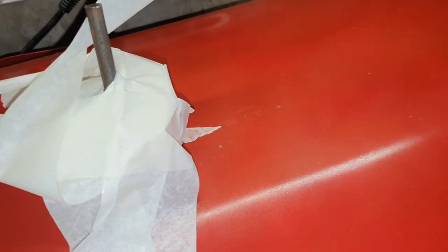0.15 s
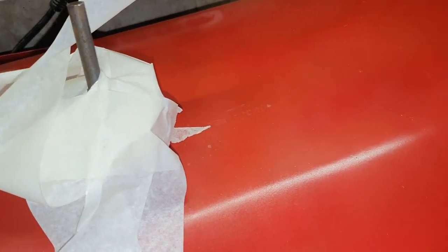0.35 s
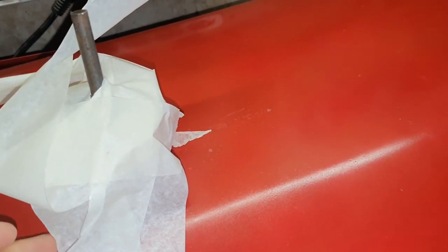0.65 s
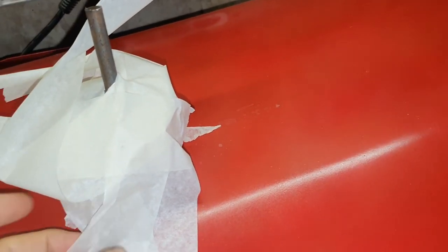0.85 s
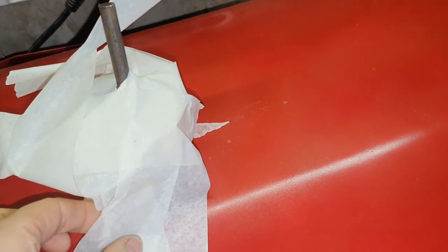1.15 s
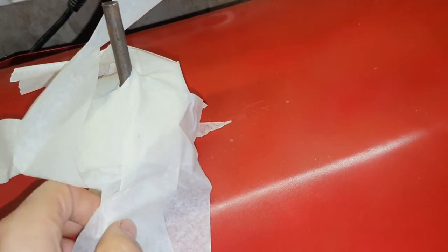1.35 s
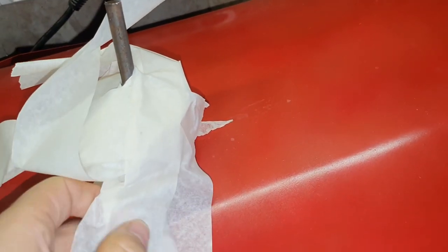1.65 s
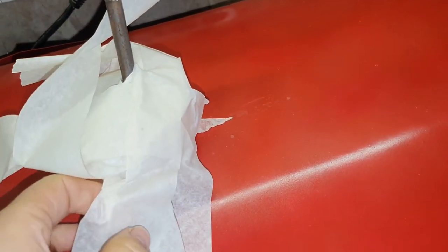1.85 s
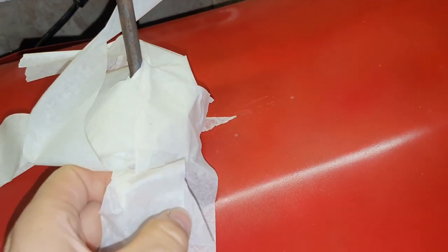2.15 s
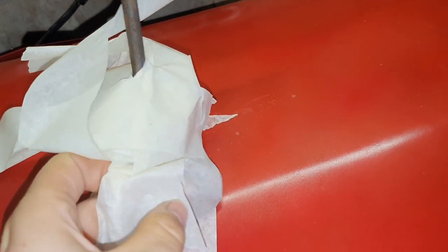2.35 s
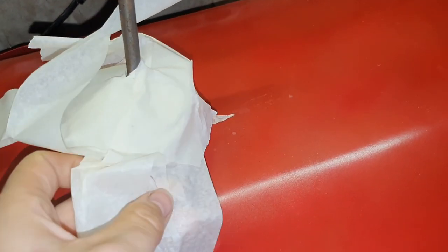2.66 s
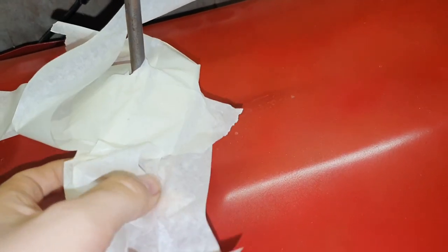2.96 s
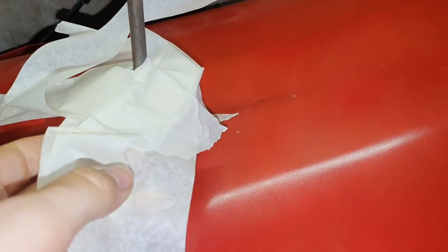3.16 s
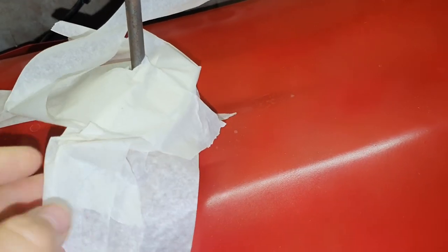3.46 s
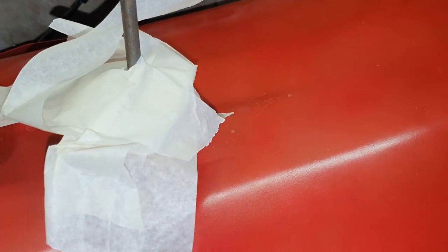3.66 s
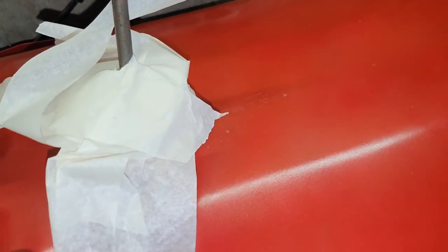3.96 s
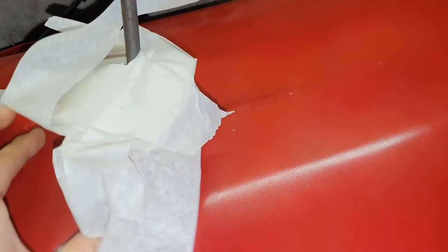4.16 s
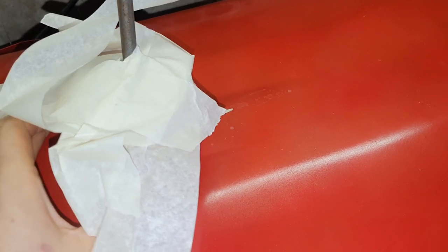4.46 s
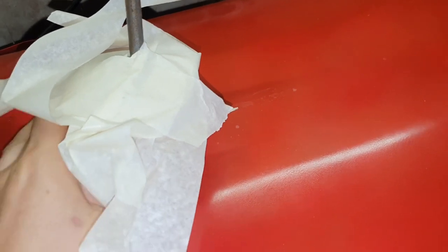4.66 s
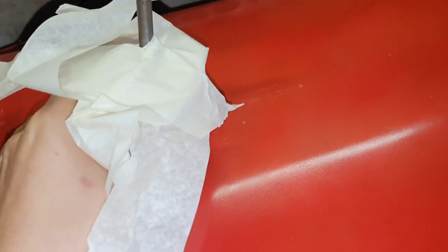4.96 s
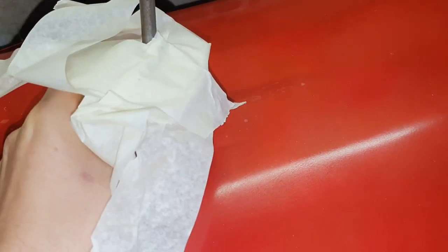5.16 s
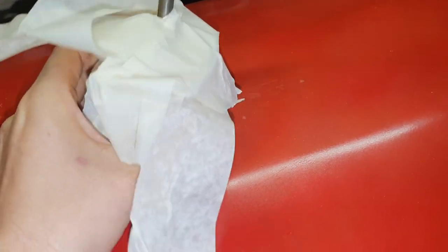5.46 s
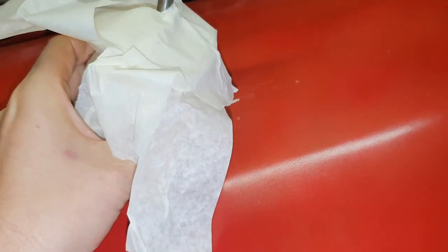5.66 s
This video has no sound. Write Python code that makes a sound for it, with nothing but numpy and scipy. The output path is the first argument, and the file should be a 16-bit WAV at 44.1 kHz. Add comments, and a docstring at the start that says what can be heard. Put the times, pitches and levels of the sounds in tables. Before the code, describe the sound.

Paper tape crinkles and tears loose right by a small handheld microphone pair, over faint low room hush. Bright snaps and glue crackle come in clumps, strongest just after one second and again past two, while the hollow steel booms softly under the tugs. Then comes a brief skin-on-paper rub, near quiet, sparse crackles, and a fist crumpling against the panel.

```python
"""A faint crackle and a low drumming open over a quiet garage hush, then masking tape snaps and tears, close by.
The tape comes off a painted steel panel by hand and is crumpled: creases ring as short pitched clicks,
glue parts as clouds of tiny ticks, a thumb hisses on the paper through broad resonances,
and the drag and tugs of the tape drum the hollow panel's modes.
Of a phone's two microphone ports the left hears it first; the right is dull in the top treble."""
import sys
import numpy as np
from scipy import signal
from scipy.fft import rfft, irfft, next_fast_len
from scipy.io import wavfile
from scipy.ndimage import uniform_filter1d, map_coordinates

SR = 44100
rng = np.random.default_rng(int(sys.argv[2]) if len(sys.argv) > 2 else 0)


def dump_mix(stems):
    """Bounce the given channels to the path in sys.argv[1] as a 16-bit WAV at rate SR."""
    frames = np.atleast_2d(stems).T  # one column per channel
    limited = np.clip(frames, -1, 1)  # hard clip at full scale
    pcm = np.round(limited * 32767).astype(np.int16)
    wavfile.write(sys.argv[1], SR, pcm)


N = 256662


def amp(db):
    """dB to gain."""
    return 10 ** (np.asarray(db) / 20)


def unit(x):
    """Scaled to rms 1."""
    return x / np.sqrt(np.mean(x ** 2) + 1e-20)


def along(points, hz):
    """(Hz, value) points read on a log frequency axis."""
    f, v = np.transpose(points)
    return np.interp(np.log(hz + 1), np.log(f + 1), v)


def curves(rows):
    """One value per sample for each column after the time."""
    s, *cols = np.transpose(rows)
    return [np.interp(np.arange(N) / SR, s, c) for c in cols]


def wobble(rate):
    """A smooth random curve, rate knots a second."""
    knots = rng.standard_normal(int(N * rate / SR) + 4)
    return map_coordinates(knots, [np.arange(N) * rate / SR])


def filtered(x, response):
    """x times a complex response of frequency."""
    m = next_fast_len(x.shape[-1] + 8192)
    spectrum = rfft(x, m) * response(np.fft.rfftfreq(m, 1 / SR))
    return irfft(spectrum, m)[..., :x.shape[-1]]


def mode(f, hz, width):
    """A causal resonance of peak gain 1."""
    return 1j * f * width / (hz * hz - f * f + 1j * f * width)


def noise(spectrum, alike):
    """Stereo noise of rms 1; alike is how much both sides share, 0 to 1."""
    alike = np.clip(alike, 0, 1)
    mid, side = rng.standard_normal((2, N)) * np.sqrt([[1 + alike], [1 - alike]])
    return unit(filtered(np.array([mid + side, mid - side]), lambda f: amp(along(spectrum, f))))


def white(alike):
    """Stereo noise with a flat spectrum."""
    return noise([(100, 0)], alike)


def evened(x, span_s, share):
    """Chance swells longer than span_s are partly levelled out."""
    power = np.abs(uniform_filter1d((x ** 2).mean(0), round(span_s * SR)))
    return unit(x / (power + 1e-12) ** (share / 2))


def patchy(x, depth_db):
    """Folds in the paper favour now one band, now another."""
    z = signal.stft(x, nperseg=256)[2]
    field = rng.standard_normal(z.shape[1:])
    field = uniform_filter1d(uniform_filter1d(field, size=4, axis=0), size=6, axis=1)
    return signal.istft(z * amp(depth_db * unit(field)), nperseg=256)[1][:, :N]


# colour of the garage hush: frequency_hz, relative_level_db
HUSH_COLOUR = [(15, -28.5), (30, -3.5), (110, 3), (170, -16.5), (290, -13), (450, -21), (900, -27),
               (5000, -32.5), (7300, -30.5), (15500, -35.5)]


def hush():
    """Steady garage air: shaped noise, mostly low, partly shared by both sides."""
    return amp(-73) * noise(HUSH_COLOUR, alike=0.45)


# how fast the nearby surfaces die away: frequency_hz, t60_s
WALL_DECAY = [(200, 0.2), (2000, 0.13), (10000, 0.11)]


def walls(x, step=SR // 4):
    """Nearby surfaces answer with a short diffuse tail, redrawn each quarter second so no fixed colour builds up."""
    out = np.zeros((2, N + SR))
    for k in range(0, N, step):
        hz, t, z = signal.stft(rng.standard_normal((2, step)), SR, nperseg=128)
        fading = amp(-60 * t / along(WALL_DECAY, hz)[:, None])
        tail = signal.istft(z * fading, SR, nperseg=128)[1]
        wet = signal.fftconvolve(x[:, k:k + step], tail / np.linalg.norm(tail[0]), axes=1)
        out[:, k + 60:][:, :wet.shape[1]] += wet  # 60 samples of travel
    return out[:, :N]


# resonances of the hollow steel panel: pitch_hz, width_hz, level_db
PANEL_MODES = [(179.6, 32, -17.5), (299, 31.7, 5.5), (441, 48, -12), (587.8, 47, -12.5), (726, 150, -11),
               (990, 35, -14.5), (1260, 28, -14.5)]


def steel(f):
    """The panel's modes under a steady shake, neighbours in opposite phase."""
    return sum((-1) ** k * amp(db) * mode(f, hz, width) for k, (hz, width, db) in enumerate(PANEL_MODES))


# the closing fist leaning on the panel's lowest mode: start_s, level_db
FIST = [(5.31, -110), (5.335, -50), (5.42, -42), (5.5, -50), (5.56, -68), (5.62, -110)]


def grip():
    """The closing fist leans on the panel: noise through its lowest mode alone, twice over."""
    hz, width, _ = PANEL_MODES[0]
    lowest = unit(filtered(white(alike=1.0), lambda f: mode(f, hz, width) ** 2))
    return amp(curves(FIST)[0]) * lowest


# sudden tugs: start_s, level_db, upper_modes_db (added above 350 Hz), free_ring_s, rustle_db
PANEL_TUGS = [(0.654, -51.5, 20, 0.022, -61), (0.795, -59.5, 24, 0.025, -58),
              (0.927, -54.5, 17.5, 0.037, -57), (0.966, -48, 7, 0.1, -45.5), (1.184, -54, -5, 0.025, -59),
              (1.303, -28, 14, 0.056, -29.5), (1.431, -43.5, 18, 0.06, -65), (1.64, -43.5, 14, 0.06, -45.5),
              (1.951, -47, 18, 0.068, -43.5), (2.049, -55.5, 21, 0.043, -100),
              (2.177, -55.5, 29, 0.078, -46.5), (2.271, -54.5, 21, 0.045, -41),
              (2.408, -44.5, 11, 0.065, -37.5), (2.549, -58.5, 20, 0.04, -35.5),
              (2.598, -42, 12.5, 0.053, -42.5), (2.644, -37.5, 11, 0.088, -46),
              (2.755, -26.5, 12, 0.07, -35), (2.919, -48, -15.5, 0.17, -74), (3.004, -36.5, 10, 0.092, -51),
              (4.632, -49.5, 19, 0.03, -54), (4.703, -49.5, 12.5, 0.13, -47),
              (4.912, -49.5, 5, 0.093, -53.5), (5.235, -43.5, -26, 0.069, -55.5),
              (5.325, -37, 17, 0.13, -34), (5.39, -48.5, 21, 0.07, -52.5), (5.485, -54.5, 15, 0.052, -62.5),
              (5.536, -47.5, -3.5, 0.063, -72), (5.73, -71, 15, 0.037, -55)]
DETUNE = .012  # spread of each mode's pitch from tug to tug as the hand's pressure shifts it, a share


def tug_rings():
    """Each tug sets the panel's modes ringing as decaying sines until tape or hand damps them."""
    out, t = np.zeros((2, N)), np.arange(SR // 4) / SR
    hz, width_hz, mode_db = np.transpose(PANEL_MODES)[:, :, None]
    upper = hz > 350
    for s, db, upper_db, free_s, _ in PANEL_TUGS:
        strength = mode_db + upper_db * upper + rng.normal(0, 0.67, hz.shape)
        # the stuck tape soaks up the upper modes faster than the lower ones
        decay = np.exp(-.6 * width_hz * np.where(upper, 3.5, 1) * t)
        tone = np.sin(2 * np.pi * hz * rng.normal(1, DETUNE, hz.shape) * t)
        ring = (amp(strength) * decay * tone).sum(0)
        damped = (1 - np.exp(-t / 0.00065)) * amp(-60 * np.clip(t - free_s, 0, 1) / 0.059)
        at = round(s * SR)
        out[:, at:at + len(t)] += (amp(db) * ring * damped)[:N - at]
    return out


# how hard the tape drags at the panel: start_s, drumming_db
DRAG = [(0, -63), (.21, -84), (.5, -83), (.55, -61), (.68, -58), (1.15, -54.5), (1.31, -32), (1.6, -65.5),
        (1.92, -71.5), (2.0, -65.5), (2.45, -45), (2.75, -37.5), (2.97, -59.5), (3.16, -50), (3.58, -69.5),
        (4.0, -80), (4.12, -49.5), (4.38, -53), (4.5, -63.5), (5.04, -52.5), (5.19, -73.5), (5.3, -56.5),
        (5.43, -34.5), (5.64, -70.5), (5.82, -51)]
# colour of the rustle: frequency_hz, relative_level_db
RUSTLE_COLOUR = [(150, -31.5), (300, -7), (480, 0.5), (640, 12.5), (850, -14.5), (1200, -1), (1800, -8.5),
                 (3500, -23.5), (8000, -46.5)]
FIRM_DB = -40  # drumming of a firm pull
RUSTLE_DB, RUSTLE_GROWS = -55.5, 1.25  # level at a firm pull; dB per dB of pull
# a tug leaves the tape shuddering: level against the tug's, rise time, fading
SHUDDER_DB, SHUDDER_RISE_S, SHUDDER_DB_PER_S = -6.5, 0.0051, 160


def drag():
    """Dragging tape shakes the panel and rustles all along, with a fading shudder after each tug."""
    pull_db = curves(DRAG)[0]
    drum = amp(pull_db)
    rustle = amp(RUSTLE_DB + RUSTLE_GROWS * (pull_db - FIRM_DB))
    for s, db, _, _, rustle_db in PANEL_TUGS:
        since = np.clip(np.arange(N) / SR - s, 0, None)
        shudder = (1 - np.exp(-since / SHUDDER_RISE_S)) * amp(-SHUDDER_DB_PER_S * since)
        drum = drum + amp(db + SHUDDER_DB) * shudder
        rustle = rustle + amp(rustle_db) * shudder
    shake = white(alike=0.89) * amp(4.8 * wobble(40))
    out = drum * evened(filtered(shake, steel), span_s=0.02, share=0.43)
    return out + rustle * amp(3 * wobble(70)) * noise(RUSTLE_COLOUR, alike=.9)


# colour of the hand's weight on the panel: frequency_hz, relative_level_db
RUMBLE_COLOUR = [(15, -42), (25, -20), (86, 1), (130, 1.5), (167, -3.5), (220, -5), (290, -15.5),
                 (480, -120)]
RUMBLE_DB, RUMBLE_GROWS = -55, 0.68  # level at a firm pull; dB per dB of pull


def rumble():
    """The hand's weight on the panel: low noise that grows with the pull."""
    level_db = RUMBLE_DB + RUMBLE_GROWS * (curves(DRAG)[0] - FIRM_DB)
    return amp(level_db + 0.93 * wobble(27)) * noise(RUMBLE_COLOUR, alike=1.0)


def panel():
    """All that sounds through the steel."""
    return drag() + rumble() + grip() + tug_rings()


# thumb sliding over the paper: start_s, level_db
THUMB = [(3.19, -67), (3.225, -47), (3.3, -47.5), (3.4, -50.5), (3.435, -63), (3.499, -60.5), (3.52, -100)]
# resonances of the gap under the thumb: pitch_hz, width_hz, level_db
THUMB_GAP = [(3000, 700, -5), (4600, 800, 1), (6800, 800, 0), (10000, 1400, -9)]
# colour of the tape's paper, here and in the crackle and snaps: frequency_hz, relative_level_db
PAPER_COLOUR = [(100, -90.5), (350, -15.5), (1000, -0.5), (2000, -2), (3000, 0), (5000, -2), (6600, -1.5),
                (7400, -6.5), (12000, -3), (16000, -8.5)]


def slide():
    """Skin on paper hisses through the broad resonances of the gap under the thumb."""
    def gap(f):
        return 0.022 + sum(amp(db) * np.abs(mode(f, hz, width)) ** 2 for hz, width, db in THUMB_GAP)
    hiss = unit(patchy(filtered(noise(PAPER_COLOUR, alike=.5), gap), depth_db=1.3))
    s, first_s, last_s = np.arange(N) / SR, THUMB[0][0], THUMB[-1][0]
    touching = (s > first_s) & (s < last_s)
    return touching * amp(curves(THUMB)[0] + 1.6 * wobble(37)) * hiss


def crackle(count, spread_db, hiss, size=48):
    """Glue threads part as tiny ticks of unequal size, in clumps; returned below and above 7200 Hz."""
    when, pitch, big, spot = rng.random((count, 4)).T
    hz = 900 * (16000 / 900) ** pitch[:, None]
    t = np.arange(size) / SR
    strength = amp(-spread_db * np.log(big[:, None] + 0.06)) * np.sqrt(hz)
    ticks = strength * np.exp(-t * hz / 4.5) * np.sin(2 * np.pi * hz * t)
    at = (when * N).astype(int)[:, None] + np.arange(size)
    late = (5 * spot[:, None]).astype(int)  # ticks come from many spots, at different lags between the ports
    pair = np.array([np.bincount((at + lag).ravel(), ticks.ravel(), N + 2 * size)[:N] for lag in (2, late)])
    clumps = amp(7.1 * wobble(60) + 0.43 * wobble(250))
    pair = (unit(pair) + hiss * white(alike=0.063)) * clumps
    pair = evened(patchy(pair, depth_db=4), span_s=0.014, share=0.92)
    low = unit(filtered(pair, lambda f: amp(along(PAPER_COLOUR, f)) * (f < 7200)))
    high = unit(filtered(pair, lambda f: amp(along(PAPER_COLOUR, f)) * (f >= 7200)))
    return low, high


# glue slowly letting go: start_s, crackle_db (the lesser creases follow it too)
GLUE_CREEP = [(0, -65.5), (.07, -78.5), (.45, -93), (.72, -69), (1.07, -67.5), (1.33, -40), (1.63, -64.5),
              (2.0, -77.5), (2.3, -45.5), (2.6, -47), (2.9, -56), (3.3, -58), (3.55, -74), (4.06, -89.5),
              (4.2, -44), (4.5, -57), (4.75, -50.5), (5.04, -79), (5.3, -80.5), (5.4, -47), (5.52, -78.5),
              (5.67, -82), (5.82, -67)]
CREEP_TREBLE_DB = -8.5


def creep():
    """Glue lets go slowly in a thin crackle of rising and falling level."""
    low, high = crackle(count=12000, spread_db=2.5, hiss=1.0)
    return amp(curves(GLUE_CREEP)[0]) * (low + amp(CREEP_TREBLE_DB) * high)


# strips of glue tearing loose at once: start_s, length_s, level_db, swell_db (over the length), treble_db
GLUE_RIPS = [(0.634, 0.03, -62, 0, -13), (0.658, 0.014, -36, -21, -7), (0.694, 0.03, -56, 13, -6),
             (0.733, 0.015, -34, -20, -10), (0.796, 0.014, -33, -9, -6), (0.878, 0.015, -41, 7.5, -5),
             (0.937, 0.0071, -59, 1, -12), (0.95, 0.0043, -33, -31, -20), (1.015, 0.047, -39, -8.5, -11.5),
             (1.086, 0.037, -51.5, 10.5, -11), (1.17, 0.0088, -67, -3, -16), (1.181, 0.14, -38, 2, -8.5),
             (1.264, 0.087, -25, -2.5, -1.5), (1.365, 0.066, -31.5, -5, -6.5),
             (1.444, 0.0082, -23.5, -9, -12), (1.45, 0.043, -46.5, 1, -10), (1.598, 0.036, -56.5, -1, -7),
             (1.628, 0.025, -38, 5, -8.5), (1.705, 0.091, -53.5, -8.5, -3.5),
             (1.828, 0.0075, -50.5, -12.5, -25), (1.951, 0.01, -37.5, -16, 4.5),
             (1.98, 0.075, -61.5, 13, -5.5), (2.139, 0.14, -36.5, -27.5, -4),
             (2.268, 0.019, -20.5, -13.5, -8), (2.391, 0.011, -13, -19, -12), (2.466, 0.029, -38, 11, -8),
             (2.53, 0.015, -33, 12.5, -8), (2.55, 0.021, -21.5, -3, -4.5), (2.559, 0.0066, -29, 1, -7),
             (2.58, 0.035, -41, 3, -3), (2.675, 0.019, -21.5, 1, -1), (2.698, 0.009, -39, -10.5, -17),
             (2.709, 0.013, -48, 12, -10), (2.718, 0.012, -21, -4, -0.5), (2.733, 0.027, -35.5, -2, -6),
             (2.83, 0.012, -50.5, 9, -4), (2.841, 0.0054, -28.5, -10, -16), (3.015, 0.02, -46.5, 4, -6),
             (3.128, 0.0091, -46, 1, -1), (3.152, 0.025, -36.5, 3.5, -11), (3.428, 0.0048, -46.5, 3, 4.5),
             (3.516, 0.022, -64.5, -9, -10), (3.615, 0.016, -69.5, -2.5, 9),
             (3.746, 0.024, -65.5, -4.5, -1.5), (3.998, 0.077, -64, 0.5, -0.5),
             (4.072, 0.014, -52.5, -4, -8), (4.089, 0.014, -46.5, 6.5, -7), (4.139, 0.063, -46, -15, -2),
             (4.19, 0.012, -36, 0.5, 0.5), (4.335, 0.062, -42.5, -4.5, -5), (4.474, 0.023, -50.5, 1, -7),
             (4.62, 0.023, -49, -6, -4), (4.63, 0.013, -34, -15, -8), (4.684, 0.038, -47.5, 16, -2.5),
             (4.723, 0.13, -58, 15.5, -9), (5.005, 0.065, -64, -7.5, -1.5), (5.228, 0.065, -58, -3, -6),
             (5.307, 0.048, -59.5, 11, 2), (5.553, 0.0068, -63.5, 12, -0.5)]
RIP_T60_S = .012  # a rip stops short


def rips():
    """Strips of glue tear loose at once: gated crackle that swells or fades, then stops short."""
    t, body, top = np.arange(SR // 5) / SR, np.zeros(N + SR), np.zeros(N + SR)
    for s, length, db, swell_db, treble_db in GLUE_RIPS:
        swell = swell_db * np.clip(t / length, 0, 1)
        stop = -60 * np.clip(t - length, 0, 1) / RIP_T60_S
        shape = amp(db + swell + stop)
        body[round(s * SR):][:len(t)] += shape
        top[round(s * SR):][:len(t)] += amp(treble_db) * shape
    low, high = crackle(count=30000, spread_db=4.5, hiss=1.0)
    return body[:N] * low + top[:N] * high


# the clearest creases snapping: start_s, level_db, pitch_hz, treble_db (above 7200 Hz)
CREASES = [(0.6415, -31.5, 5860, 4), (0.66, -14.5, 6230, -19), (0.7131, -20.5, 2580, -4),
           (0.7312, -20, 2280, 1), (0.7432, -7, 1660, -3.5), (0.787, -19.5, 2500, 0),
           (0.7973, -12.5, 5500, -3), (0.8154, -12, 5000, 5), (0.843, -28, 2480, -4),
           (0.8804, -14.5, 4850, 8), (0.9453, -20.5, 6030, 1), (0.9538, -0.5, 2830, -7.5),
           (1.0167, -19, 1490, -11), (1.1166, -15.5, 4730, -9), (1.1627, -15, 4470, -9),
           (1.1812, -11, 2570, 2), (1.1985, -4, 5170, -18), (1.2044, -11.5, 5860, -11),
           (1.2278, -12.5, 3100, -2), (1.24, -13, 4160, 0), (1.262, -5, 5750, -3), (1.2862, -2, 6000, 0),
           (1.318, -6, 5430, 2), (1.3635, -5, 4130, 1), (1.4152, -18, 1750, -7), (1.4426, -7, 2760, -18),
           (1.6113, -27, 6070, -9), (1.6292, -11.5, 6400, 4), (1.6456, -24, 2850, -11),
           (1.749, -27, 1220, -5), (1.828, -43, 3610, -5), (1.9527, -16, 1730, 7.5),
           (2.0306, -20.5, 2980, 0), (2.045, -23.5, 6120, -3), (2.0828, -32, 6060, 0),
           (2.1336, -21, 1260, -15), (2.1452, -17, 2980, 1), (2.1787, -15.5, 1200, -17.5),
           (2.1932, -12, 3430, -1), (2.269, -5.5, 2900, -13), (2.2852, -9, 3230, 13),
           (2.3223, -14.5, 4180, 4), (2.3574, -17, 5960, 5), (2.392, -8.5, 6400, -11),
           (2.3996, -2.5, 2670, 5), (2.422, -9, 6000, 6), (2.442, -4, 2600, -1.5), (2.469, -1, 4740, 4.5),
           (2.4877, -2, 3220, 7.5), (2.5346, -9, 6840, 5), (2.5546, -0.5, 3380, 0), (2.577, -10, 3850, -2),
           (2.6483, -16, 3900, 4), (2.676, -4, 6500, -16), (2.7, -4.5, 3500, -15), (2.724, -7, 5940, -3),
           (2.7524, -3, 1630, -4), (2.787, -14, 1570, -2), (2.84, -16, 6680, 22), (2.8494, -7, 1210, 0),
           (2.9506, -14.5, 3770, 2), (2.9582, -22, 6570, -3), (3.0994, -26.5, 1860, -18),
           (3.1207, -20.5, 3820, -1), (3.1314, -16.5, 5590, 0), (3.1669, -8.5, 6650, -2),
           (3.1844, -24, 2840, -3), (3.2144, -21, 4360, -7), (3.263, -25, 5200, -9),
           (3.4296, -21.5, 2800, 0.5), (3.457, -28, 3140, 0), (3.521, -28.5, 6200, 7.5),
           (3.532, -35.5, 2510, 0), (3.619, -43, 6040, -3.5), (3.6601, -41, 6240, 9),
           (3.7534, -41.5, 6070, -1.5), (4.0875, -22, 5970, 8), (4.0988, -15.5, 6200, 10),
           (4.1445, -22, 5000, -6), (4.166, -21, 6100, 5), (4.181, -17, 4270, -6), (4.236, -19.5, 4730, 4),
           (4.273, -11.5, 4830, 12.5), (4.3104, -26, 1810, 11), (4.359, -21.5, 1930, -7),
           (4.4564, -32, 1900, -14), (4.607, -24, 3570, 6), (4.631, -26, 1420, -6),
           (4.6568, -12, 2170, -2.5), (4.694, -15.5, 1440, -20), (4.7052, -11, 2700, 2),
           (4.7125, -11.5, 2700, -3), (4.7337, -18.5, 5000, -11), (4.761, -15.5, 2570, -7),
           (4.798, -25, 1850, 4), (4.8728, -23, 2110, -3), (5.025, -31.5, 1400, 1),
           (5.0449, -39.5, 6200, 2), (5.222, -35, 1236, 0), (5.2424, -27, 1520, -21.5),
           (5.3242, -8, 2310, -7), (5.3652, -28, 2070, -9), (5.423, -16, 6750, 15), (5.557, -36, 1250, 2),
           (5.6905, -46, 1730, -6.5), (5.812, -41.5, 2810, -1.5)]
# the 260 lesser creases: level over the glue's crackle, scatter, pitch range
SMALL_DB, SMALL_SPREAD_DB, SMALL_HZ = 9.5, 5.5, (1200, 6800)


def lesser_creases():
    """Small creases at random times, louder where the glue crackles more; rows like CREASES."""
    when, size, pitch, bright = rng.random((260, 4)).T
    glue_db = curves(GLUE_CREEP)[0][(when * N).astype(int)]
    small_db = glue_db + SMALL_DB - SMALL_SPREAD_DB * np.log(size + .01)
    hz = SMALL_HZ[0] * (SMALL_HZ[1] / SMALL_HZ[0]) ** pitch
    return list(zip(when * N / SR, small_db, hz, 16 * bright - 8))


def snaps():
    """Each crease is a click ringing briefly at its own pitch, with a short spray of smaller cracks."""
    out, t = np.zeros((2, N + SR)), np.arange(2048) / SR
    for s, db, hz, treble_db in CREASES + lesser_creases():
        click = rng.standard_normal(len(t)) * t / 0.00051 * np.exp(-t / 0.00026)
        click[8] += 3.5  # the fold gives way at once
        spiky = rng.standard_normal((2, len(t))) * amp(7.6 * rng.standard_normal(len(t) // 32).repeat(32))
        spray = .06 * (spiky[0] + .6 * spiky) * amp(-60 * t / 0.023)

        def colour(f):
            return amp(along(PAPER_COLOUR, f)) * (0.35 * amp(treble_db * (f > 7200)) + mode(f, hz, 0.29 * hz))
        burst = filtered(click + spray, colour)
        burst = amp(db) * burst / np.abs(burst).max()
        shift = rng.integers(-2, 3)  # creases lie at different spots, so the gap between the ports varies
        out[0, round(s * SR):][:len(t)] += burst[0]
        out[1, round(s * SR) + shift:][:len(t)] += burst[1]
    return out[:, :N]


# where the hand works: start_s, left_minus_right_db, right_port_cup_ring_db
HAND_PLACE = [(0, -2, -17), (.35, -19, -17), (.65, -0.5, -9), (.95, -2.5, -14.5), (1.28, 0.5, 6),
              (1.9, -2, 0.5), (2.27, -0.5, -2.5), (2.68, 0, 9.5), (3.16, 0.5, -10), (3.7, -2.5, 5),
              (4.3, 0, -27), (5.82, -1.5, -5)]
CUP_HZ, CUP_WIDTH_HZ = 6150, 900  # hollow of the cupped paper


def in_hand(tape):
    """The hand's place pans the tape; the hollow of the cupped paper rings at the right port."""
    pan_db, cup_db = curves(HAND_PLACE)
    left, right = tape * amp([pan_db / 2, -pan_db / 2])
    cupped = amp(cup_db) * filtered(right, lambda f: mode(f, CUP_HZ, CUP_WIDTH_HZ))
    return np.array([left, right + cupped])


def scene():
    """Tape and panel in the garage, over its hush."""
    tape = in_hand(snaps() + creep() + rips() + slide())
    return hush() + amp(-11.0) * walls(tape) + panel() + tape


# colour of the right port against the left: frequency_hz, level_db
RIGHT_COLOUR = [(60, 5), (300, 2.5), (1200, -2.5), (2200, 0), (6500, -0.5), (8000, -5), (9500, -0.5),
                (11800, -2), (13500, -15), (16000, -21)]
# sound bending round the case changes the left port's lead: frequency_hz, phase_rad
CASE_DETOUR = [(1, 0), (600, -0.29), (1200, -0.91), (1720, -1.4), (2500, 0.99), (4200, 0.67)]
LEAD_S, TOP_HZ = 0.000342, 15750  # left port ahead, before the detour; where the band limit sets in


def record(dry):
    """Two ports at different distances and with different colour; the top fades out above the band limit."""
    def ports(f):
        lead = 2 * np.pi * f * LEAD_S + along(CASE_DETOUR, f)
        return np.array([np.exp(.5j * lead), amp(along(RIGHT_COLOUR, f)) * np.exp(-.5j * lead)])

    def limit(f):
        edges_hz = [TOP_HZ - 150, TOP_HZ + 200, TOP_HZ + 800, TOP_HZ + 1100]
        return amp(np.interp(f, edges_hz, [0, -24, -30, -120]))
    return filtered(dry, lambda f: ports(f) * limit(f))


dry = scene()
out = record(dry)
dump_mix(out)
```